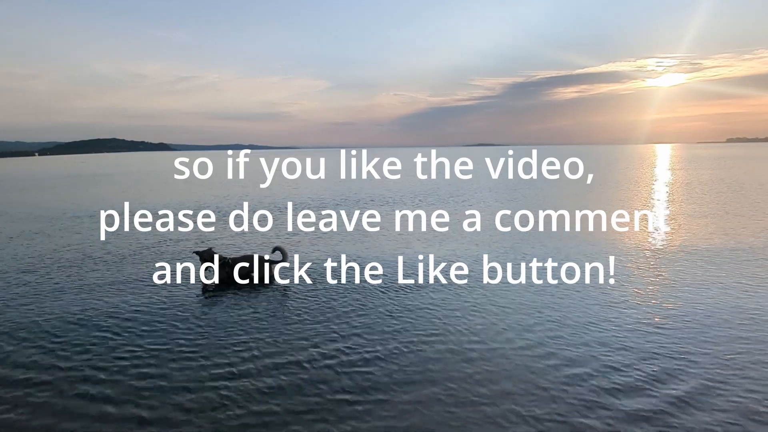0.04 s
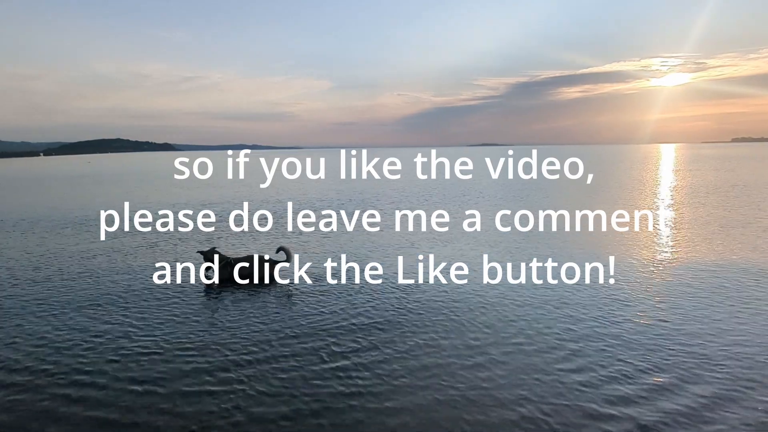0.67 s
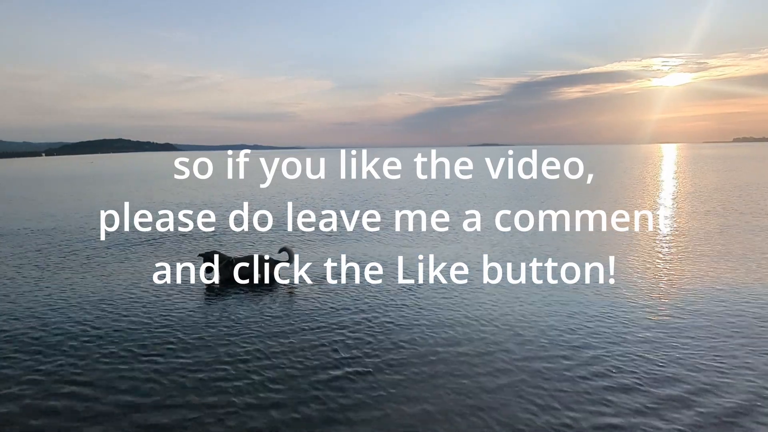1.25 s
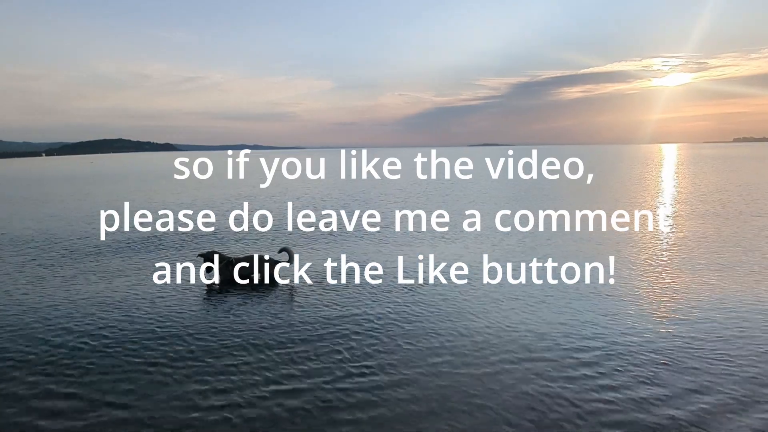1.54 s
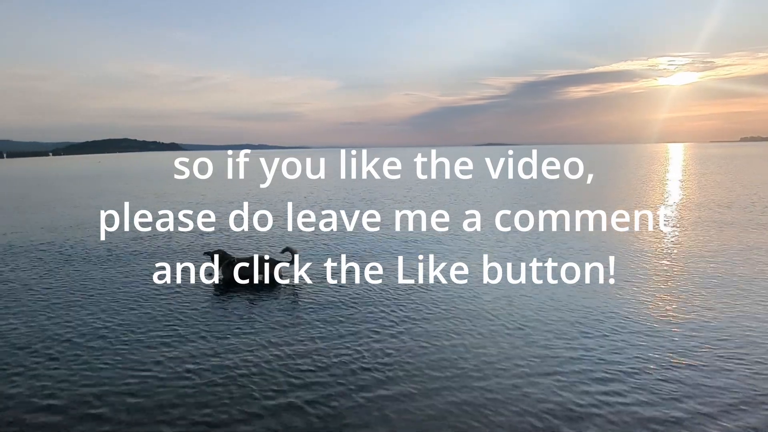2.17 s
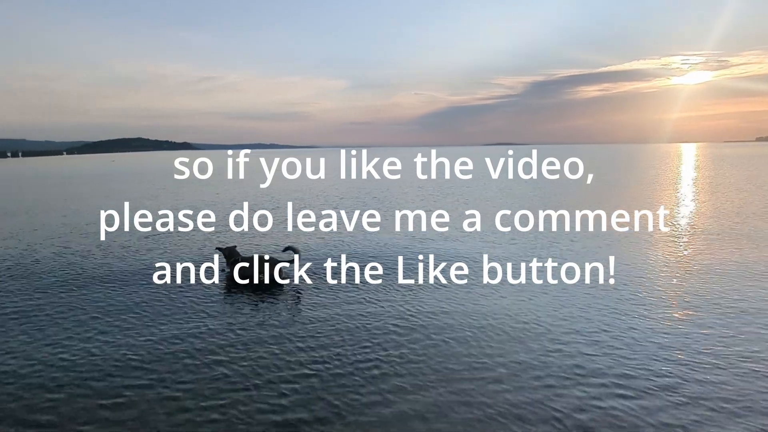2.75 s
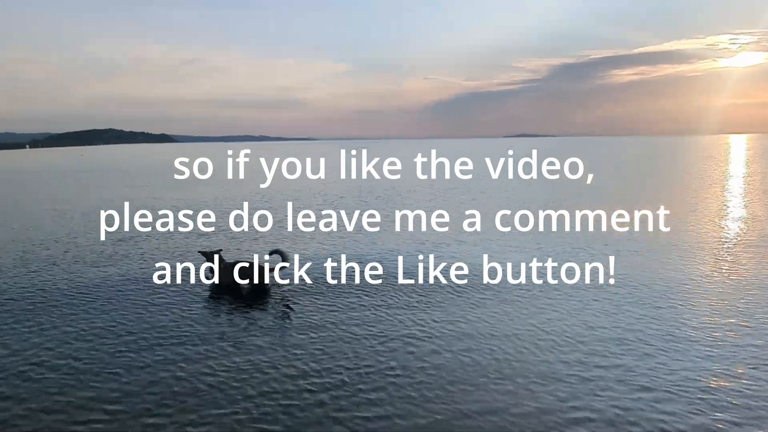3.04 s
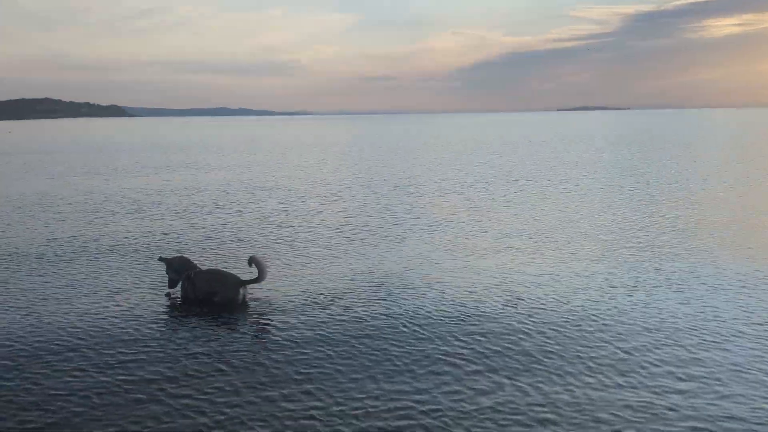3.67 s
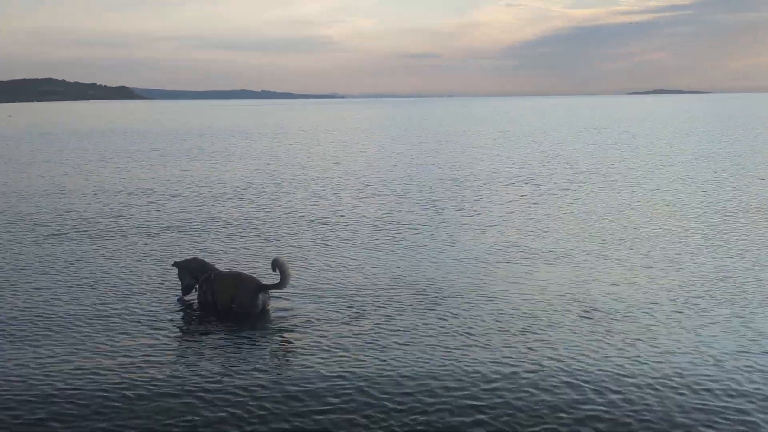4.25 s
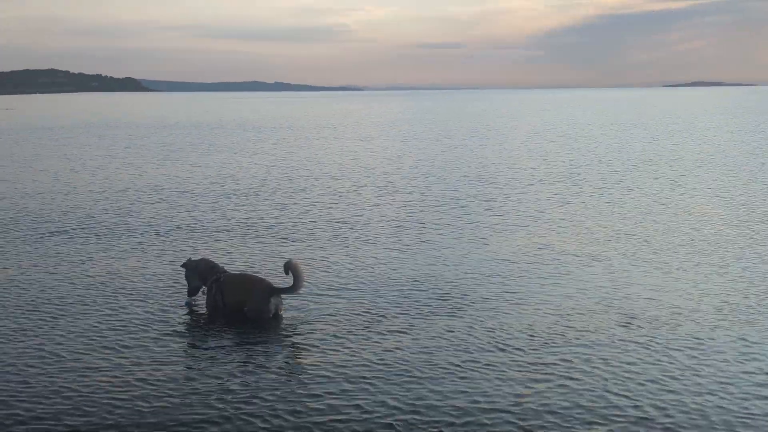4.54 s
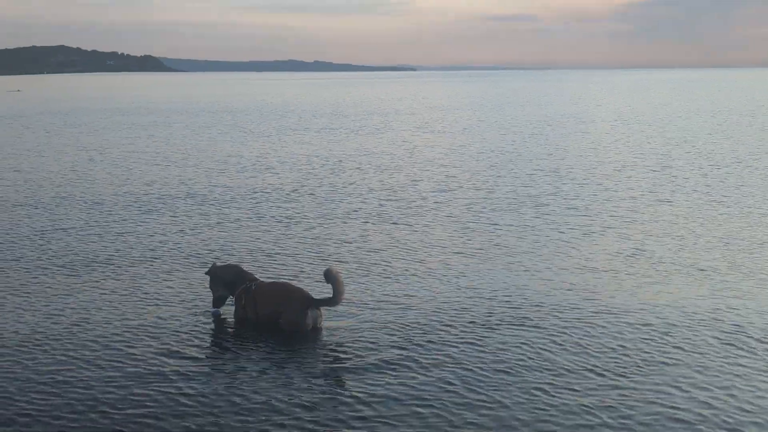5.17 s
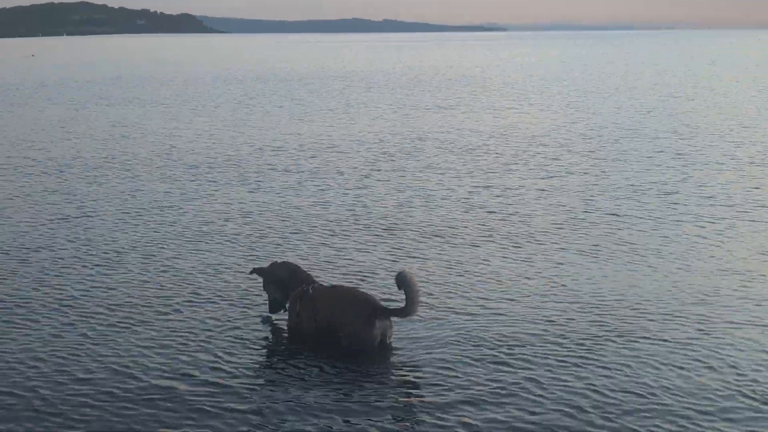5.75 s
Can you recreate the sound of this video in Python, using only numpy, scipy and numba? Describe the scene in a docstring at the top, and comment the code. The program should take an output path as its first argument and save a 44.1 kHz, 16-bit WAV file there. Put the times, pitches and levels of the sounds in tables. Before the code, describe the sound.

Shallow lake water sloshes, bubbles and drips near the microphone as a dog wades, then calms to a gentle wash with two faint, reedy bird chirps. A second bout of splashing and gurgling follows and fizzes away. In the last part, wind rumbles and thumps on the microphone, with two more faint chirps from the shore. Under it all lies a low, distant drone.

```python
"""A dog wades in the shallows of a calm lake. A low swell breaks close by: bubbles ring, drops plop and
tick, air pockets gulp. The water settles and a shore bird twitters twice. Around 3 s it sloshes and
splashes again, leaving hissing foam. From 4 s wind buffets the two microphone ports hardest; the bird
calls at 5 s and starts again at the end. Throughout, a breeze rumbles and something drones far off."""
import sys
import numpy as np
from scipy import signal
from scipy.fft import rfft, irfft
from scipy.io import wavfile
from scipy.ndimage import map_coordinates
from numba import njit

SR = 44100
rng = np.random.default_rng(int(sys.argv[2]) if len(sys.argv) > 2 else 0)


def wrap_up_sound(samples):
    """Save the sound to the file named by the first command line argument, as 16-bit audio."""
    columns = np.atleast_2d(samples).T
    # keep every value between -1 and 1, then stretch to whole-number steps
    tamed = np.clip(columns, -1, 1)
    steps = np.round(tamed * 32767).astype(np.int16)
    wavfile.write(sys.argv[1], SR, steps)


N = 264600

# water surges: crest_s, level_db, build_s, drain_s, tilt_db_per_octave, hollow_db
WATER_SURGES = [(.01, -38.5, 0.79, 0.19, -2.5, 2), (.23, -50.5, 0.19, 0.32, 1.64, 4),
                (.83, -51.5, 0.72, 0.38, -3.5, -0.4), (1.25, -61.5, 0.66, 0.32, -2.2, 7),
                (1.93, -63, 2.8, 4, -3, 1), (2.681, -56.5, 0.3, 0.071, -1, 11),
                (2.88, -47, 0.32, 0.33, -1, 2.5), (3.175, -43, 0.062, 0.073, 0.1, 4.5),
                (3.33, -54.5, 1.02, 0.56, 3, 7), (3.462, -43.5, 0.61, 0.4, -2, -5.5),
                (3.9, -61, 0.29, 0.64, -1.6, -4.5), (4.63, -59, 0.93, 0.28, -4, 1.5),
                (6.0, -75, 0.7, 0.32, 6, 6.5)]
# gurgle, slosh, hollow swish, fizz, spray: low_hz, high_hz, surge_offset_db, calm_db
WATER_BANDS = [(220, 704, -6, -85), (765, 1530, -1.5, -81.5), (1627, 2464, -1, -87),
               (2402, 5190, 1.5, -76.5), (5800, 14000, -5.5, -72.5)]
# where the water breaks, right positive: time_s, bearing_rad
SWELL_BEARING = [(0, -0.77), (.13, -0.48), (.3, -0.35), (.6, -0.94), (1.0, -1.15), (1.15, 1.02),
                 (2.7, 1.05), (2.92, .25), (3.2, 0.77), (3.33, 0.8), (3.45, -0.021), (3.65, -0.2),
                 (3.9, -0.84), (4.7, -1.06), (5.1, 0.69), (6, 1)]
# water spectrum before each band is levelled: freq_hz, gain_db
WATER_SPECTRUM = [(200, -7.5), (350, 1.5), (560, 2.5), (980, 5.5), (1400, 5), (1900, 16), (2450, -5.5),
                  (3100, -8.5), (4100, -12), (5700, -19), (8700, -21), (9900, -26), (11600, -21.5),
                  (15500, -20.5)]
# water balance, left minus right: freq_hz, pan_db
WATER_PAN = [(380, 0.5), (700, -0.5), (1000, -2.5), (1400, 2), (1900, 6), (2400, 1.5), (3500, 1),
             (5000, 2.5), (8120, -4.5), (15000, -5)]
# falling drops: start_s, level_db, pitch_hz, pan_db
DROP_PLOPS = [(0.04, -24.5, 1708, 4), (.141, -29.5, 1920, 11), (.244, -26, 2170, 5), (0.336, -39, 2540, 8),
              (.373, -36.5, 2020, 8), (.425, -35.5, 2200, 6), (0.444, -34.5, 1750, 9), (0.51, -36, 1840, 4),
              (.945, -45, 845, 2), (2.603, -36.5, 1670, 6), (2.811, -41.5, 1080, 16),
              (2.931, -28.5, 840, 1), (2.982, -34, 1770, 9), (3.01, -30.5, 1950, 7),
              (3.066, -39.5, 1950, 5), (3.132, -32, 1760, 4), (3.147, -30.5, 2050, 6),
              (3.173, -42, 1120, 8), (3.194, -30, 2120, -2), (3.214, -23.5, 1960, 8.5),
              (3.295, -29, 2350, 7), (3.417, -36.5, 1030, 15), (3.449, -29, 1820, 3),
              (3.631, -41.5, 1130, 14), (3.888, -41.5, 1126, 5), (3.952, -44, 1025, 1),
              (5.695, -52, 2260, 1), (5.97, -44.5, 2040, -3)]
# air pockets: start_s, level_db, start_hz, end_hz, length_s
AIR_GULPS = [(.001, -27.5, 444, 520, 0.0042), (.010, -36, 550, 845, 0.011), (.026, -37, 674, 520, 0.016),
             (.046, -35, 990, 1370, 0.0088), (.051, -31.5, 442, 1560, 0.033), (.092, -40.5, 395, 560, .01),
             (.108, -41, 713, 1320, .024), (1.139, -50, 400, 856, 0.026), (2.258, -55, 1010, 930, 0.018),
             (2.57, -48, 578, 400, 0.0081), (2.655, -46.5, 316, 330, 0.022), (2.99, -44, 610, 550, 0.028),
             (3.017, -42, 2125, 3100, 0.021), (3.133, -36, 1056, 960, 0.018),
             (3.142, -38.5, 408, 322, 0.039), (3.18, -39.5, 250, 310, .018), (3.282, -38, 1996, 3200, .028),
             (3.304, -38.5, 407, 336, 0.023), (3.324, -37.5, 242, 330, 0.025),
             (3.326, -37, 850, 1090, 0.012), (3.41, -33, 520, 396, 0.015), (3.436, -34.5, 383, 338, 0.019),
             (3.476, -39, 1096, 1740, 0.029), (3.505, -35, 660, 500, 0.015), (3.53, -36, 726, 970, .016),
             (3.58, -38.5, 965, 1490, 0.014), (3.597, -37.5, 427, 850, 0.018)]
# fine droplets: start_s, level_db, pitch_hz, pan_db
DROPLET_TICKS = [(0.1208, -40, 6400, 5), (.2039, -57, 7400, -8), (0.2984, -36, 9380, -3),
                 (0.334, -47, 4430, 0), (.335, -32.5, 7960, -1), (1.7584, -49.5, 8440, -12),
                 (2.38, -48.5, 6870, -7), (2.659, -46, 11400, -11), (3.13, -33.5, 3770, -8),
                 (3.1612, -34, 8070, -9), (3.215, -30, 5100, -6), (3.4345, -32.5, 12200, -9),
                 (3.5204, -40, 12600, -5.5)]
# wind spectrum: freq_hz, gain_db
WIND_SPECTRUM = [(22, -29), (34, -18), (46, -5.5), (60, -2.5), (90, -6.5), (140, -14), (200, -25.5),
                 (300, -45.5), (500, -52)]
# gusts on the ports: peak_s, level_db, half_width_s
WIND_GUSTS = [(.33, -47, 0.035), (.65, -47.5, 0.017), (.97, -47.5, 0.12), (1.33, -47.5, 0.027),
              (2.88, -47, 0.096), (3.25, -44.5, 0.067), (3.62, -48.5, 0.091), (4.17, -38.5, 0.034),
              (4.46, -37.5, 0.098), (4.66, -37, 0.084), (4.88, -40, 0.019), (5.17, -47, 0.03),
              (5.461, -44, 0.081), (5.69, -42, 0.032), (5.821, -38.5, 0.033), (5.98, -41, 0.062)]
# thumps on the housing: start_s, level_db, pitch_hz, ring_s
WIND_BUFFETS = [(0.319, -37.5, 133, 0.042), (3.607, -31.5, 126, 0.05), (4.14, -30, 148, 0.11),
                (4.602, -23, 182, 0.091), (5.657, -47, 234, 0.031), (5.777, -37.5, 302, .024),
                (5.814, -35.5, 145, 0.19), (5.986, -46, 292, 0.044)]
# drone loudness: time_s, level_db
DRONE_LEVEL = [(0, -48.5), (.5, -58.5), (.9, -52), (1.3, -55), (2.4, -54.5), (2.95, -48.5), (4.0, -54),
               (4.7, -50.5), (4.97, -69), (6, -54)]
# drone resonances: centre_hz, width_hz, gain_db
DRONE_BANDS = [(101.1, 13, 2), (125, 35.3, 1.5), (157, 16.5, 4), (186.9, 34.6, -6)]
# bird calls: start_s, length_s, top_hz, dip_depth_ratio, level_db
BIRD_CALLS = [(.781, 0.26, 1883, 0.15, -60), (1.877, 0.28, 1844, 0.28, -55), (5.04, .255, 1768, .22, -54.5),
              (5.933, .28, 1780, 0.19, -54)]
# a call lifts, holds, dips into a rasp, recovers: time_ratio, dip_ratio, level_db, rasp_ratio
BIRD_PHRASE = [(0, .55, -11, .4), (.13, 0.05, -2, .2), (.43, 0, -0.5, .2), (.52, .45, 4.5, .25),
               (0.632, 1, -7.5, .8), (.74, 1, -6, 1), (.84, .5, -8, 0.75), (.94, 0.23, -2, .15),
               (1, 0.3, 2, .3)]
# bird timbre: multiple, gain_db, pan_db
BIRD_PARTIALS = [(1, -1.5, 7), (2, 0, -5.5), (3, -4, 4), (4, -13, 3)]

PORT_LAG_S = 0.000533
SURGE_DEPTH_DB, CREST_EXPONENT = 21.5, 1.33   # depth at build_s or drain_s; 1 = pointed, 2 = bell
FOAM_DB, FOAM_FADE_DB_PER_S = -6, 18   # relative to the spray
CHURN_DB, CHURN_PER_S, CHURN_RATIO_PER_OCTAVE = 2.03, 22, 0.92
PLOP_CYCLES, SPATTER_WINDOW_S, SPATTER_DB = 32.6, 0.016, -11.5
BREEZE_DB, BREEZE_SWING_DB, BREEZE_SWINGS_PER_S = -53.5, 2, 6.7
TRILL_PERIOD_S, TRILL_DIP_RATIO, TRILL_DIP_DB, TRILL_EXPONENT = 0.0283, 0.1, 10, 9
RASP_PITCH_RATIO, RASP_FLUTTER_DB, RASP_PER_S = 0.11, 4.5, 900


def swells():
    """The shore washes smoothly; as a swell breaks, froth thickens and near bubbles stand out."""
    levels_db = surge_levels_db()
    spray_db = levels_db[-1]
    surge = from_db(0.17 * (spray_db - spray_db.max()))
    near = bubble_cloud(count=3000, median_cycles=57.6, spread_db=3.5, max_rise=0.488, scatter_rad=0.68)
    froth = bubble_cloud(count=36000, median_cycles=7.3, spread_db=1, max_rise=0.38, scatter_rad=0.49)
    wash = shore_wash(alike_below_hz=600)
    near_gain, froth_gain, wash_gain = surge ** 2, from_db(1.5) * np.sqrt(surge), from_db(-0.5)
    water = near_gain * near + froth_gain * froth + wash_gain * wash
    water /= np.sqrt(near_gain ** 2 + froth_gain ** 2 + wash_gain ** 2)
    water = coloured(water, WATER_SPECTRUM)
    water = coloured(water, WATER_PAN, db_scale=np.array([[.5], [-.5]]))
    out = 0
    for (low_hz, high_hz, _, _), level_db in zip(WATER_BANDS, levels_db):
        octaves = np.log2(low_hz / WATER_BANDS[0][0])
        churn_db = CHURN_DB * CHURN_RATIO_PER_OCTAVE ** octaves * surge * drift(CHURN_PER_S)
        out += from_db(level_db + churn_db) * unit_rms(band(water, low_hz, high_hz, order=4))
    return out


def surge_levels_db():
    """Level per band: surges build and drain over calm water; their spray leaves fading foam."""
    t = np.arange(0, N, 100) / SR
    low_hz, high_hz, offset_db, calm_db = np.transpose(WATER_BANDS)[:, :, None]
    octaves = np.log2(low_hz * high_hz) / 2
    octaves = octaves - octaves[1]   # from the slosh band
    is_swish = np.array([[0], [0], [1], [0], [0]])
    power = 0
    for crest_s, level_db, build_s, drain_s, tilt_db_per_octave, hollow_db in WATER_SURGES:
        from_crest = np.maximum((crest_s - t) / build_s, (t - crest_s) / drain_s)
        envelope_db = -SURGE_DEPTH_DB * from_crest ** CREST_EXPONENT
        colour_db = offset_db + tilt_db_per_octave * octaves + hollow_db * is_swish
        power += from_db(level_db + envelope_db + colour_db) ** 2
    spray_db = 10 * np.log10(power[-1] + 1e-20)
    fade_db = FOAM_FADE_DB_PER_S * t
    foam_db = FOAM_DB + np.maximum.accumulate(spray_db + fade_db) - fade_db   # decaying peak hold
    power[-1] += from_db(foam_db) ** 2
    levels_db = 10 * np.log10(power + from_db(calm_db) ** 2)
    return np.array([np.interp(np.arange(N) / SR, t, db) for db in levels_db])


def bubble_cloud(count, median_cycles, spread_db, max_rise, scatter_rad):
    """Bubbles of all sizes ring around the bearing of the swell."""
    when, pitch, loudness, sustain, place, climb = rng.random((count, 6)).T
    start = when * (N - 1)
    hz = (np.sqrt(200) + pitch * (np.sqrt(16000) - np.sqrt(200))) ** 2
    level_db = spread_db * np.minimum(-np.log(1 - loudness), 4)
    polarity = (-1) ** np.arange(count)
    gain = polarity * from_db(level_db) * hz ** 0.75   # flattens the spectrum
    bearing_rad = per_sample(SWELL_BEARING)[start.astype(int)] + scatter_rad * (2 * place - 1)
    lag = PORT_LAG_S * SR * np.sin(bearing_rad)
    life = median_cycles * 2 ** (2 * sustain - 1) * SR / hz
    return unit_rms(sum_rings(start, 2 * np.pi * hz / SR, gain, life, lag, max_rise * climb))


@njit
def sum_rings(start, step_rad, start_gain, life, lag, rise):
    """Rising, decaying sines at both ports; start, life and lag in samples."""
    out = np.zeros((2, N))
    for k in range(len(start)):
        for channel in range(2):
            onset = start[k] + lag[k] * (.5 - channel)
            gain, decay = start_gain[k], np.exp(-6.9 / life[k])
            for i in range(int(onset) + 1, min(N, int(onset + .8 * life[k]))):
                age = i - onset
                gain *= decay
                if i >= 0:
                    phase_rad = step_rad[k] * age * (1 + rise[k] * age / life[k] / 2)
                    out[channel, i] += gain * np.sin(phase_rad)
    return out


def shore_wash(alike_below_hz):
    """Smooth wash from all sides; long sound waves reach both ports alike."""
    mid, side = rng.standard_normal((2, N))
    side = signal.sosfilt(signal.butter(1, alike_below_hz, "high", fs=SR, output="sos"), side)
    return unit_rms(mid + side * [[1], [-1]])


def drops():
    """Close plops, each throwing three weaker drops; gulps of air; ticks of fine spray."""
    out = np.zeros((2, N))
    for start_s, level_db, hz, pan_db in DROP_PLOPS:
        plop = ring(hz, PLOP_CYCLES / hz, rise=0.27, attack_s=0.00059, noise_gain=0.43)
        add(out, start_s, from_db(level_db) * plop, pan_db, lag_s=0.00008)
        for delay, pitch in rng.random((3, 2)):
            spatter_hz = hz * 2 ** (pitch - .5)
            ring_s = PLOP_CYCLES / spatter_hz
            spatter = ring(spatter_hz, ring_s, rise=0.2, attack_s=0.00075, noise_gain=0.38)
            add(out, start_s + SPATTER_WINDOW_S * delay, from_db(level_db + SPATTER_DB) * spatter, pan_db)
    for start_s, level_db, start_hz, end_hz, length_s in AIR_GULPS:
        add(out, start_s, from_db(level_db) * gulp(start_hz, end_hz, length_s), pan_db=1.7)
    for start_s, level_db, hz, pan_db in DROPLET_TICKS:
        tick = ring(hz, ring_s=0.015, rise=0.12, attack_s=0.000088, noise_gain=0.55)
        add(out, start_s, from_db(level_db) * tick, pan_db, lag_s=0.00044)
    return out


def ring(hz, ring_s, rise, attack_s, noise_gain):
    """Damped, gliding sine plus noise; a bubble's pitch rises as it nears the surface."""
    t, envelope = ring_envelope(ring_s, attack_s)
    noise = band(rng.standard_normal(SR // 4), hz * 0.59, hz * 1.37)[:len(t)]
    tone = np.sin(2 * np.pi * hz * t * (1 + rise * t / ring_s / 2))
    return envelope * (tone + noise_gain * noise / noise.std())


def gulp(start_hz, end_hz, length_s):
    """An air pocket sings: pitch climbs as it shrinks, sinks as it swells."""
    progress = np.linspace(0, 1, int(length_s * SR) + 2)
    period_s = 1 / start_hz + (1 / end_hz - 1 / start_hz) * progress ** 1.386
    envelope = np.tanh(progress / 0.21) * np.tanh((1 - progress) / 0.16) * from_db(-4 * progress)
    return envelope * np.sin(2 * np.pi * np.cumsum(1 / period_s) / SR)


def wind():
    """Eddies rumble in each port, louder and brighter in gusts; buffets thump the housing."""
    t = np.arange(N) / SR
    eddies = unit_rms(coloured(stereo_noise(correlation=0.63), WIND_SPECTRUM))
    breeze = from_db(BREEZE_DB + BREEZE_SWING_DB * drift(BREEZE_SWINGS_PER_S)) * eddies
    gust_power = sum(from_db(level_db) ** 2 * np.exp(-((t - peak_s) / half_width_s) ** 2)
                     for peak_s, level_db, half_width_s in WIND_GUSTS)
    bright_eddies = unit_rms(coloured(stereo_noise(correlation=0.16), WIND_SPECTRUM, db_scale=0.89))
    gusts = np.sqrt(gust_power) * bright_eddies
    thumps = np.zeros((2, N))
    for start_s, level_db, hz, ring_s in WIND_BUFFETS:
        thump = ring(hz, ring_s, rise=-0.22, attack_s=0.0012, noise_gain=0.26)
        add(thumps, start_s, from_db(level_db) * thump, lag_s=0.00096)
    return band(breeze + gusts + thumps, 37.3, 434, order=5)


def bird():
    """Reedy calls of four harmonics; the shore scatters a faint tail."""
    calls = np.zeros((2, N))
    for start_s, length_s, top_hz, dip_depth, level_db in BIRD_CALLS:
        phase_rad, envelope = bird_trill(length_s, top_hz, dip_depth)
        for multiple, gain_db, pan_db in BIRD_PARTIALS:
            partial = from_db(level_db + gain_db) * envelope * np.sin(multiple * phase_rad)
            add(calls, start_s, partial, pan_db, lag_s=0.0002)
    t, tail = ring_envelope(ring_s=0.2, attack_s=0.016)
    echoes = tail * rng.standard_normal((2, SR))[:, :len(t)] / np.sqrt(np.sum(tail ** 2))
    return calls + from_db(-13.5) * signal.fftconvolve(calls, echoes, axes=1)[:, :N]


def bird_trill(length_s, top_hz, dip_depth):
    """Phase and envelope of one unbroken trill along the phrase, shaken by rasp."""
    t = np.arange(int(length_s * SR)) / SR
    time_ratio, *columns = np.transpose(BIRD_PHRASE)
    dip, level_db, rasp = (np.interp(t / length_s, time_ratio, column) for column in columns)
    trill = np.abs(np.cos(np.pi * t / TRILL_PERIOD_S)) ** TRILL_EXPONENT
    shake = RASP_PITCH_RATIO * rasp * drift(RASP_PER_S)[:len(t)]
    flutter_db = RASP_FLUTTER_DB * rasp * drift(RASP_PER_S)[:len(t)]
    hz = top_hz * (1 - dip_depth * dip) * (1 - TRILL_DIP_RATIO * trill + shake)
    fade = np.clip(np.minimum(t, length_s - t) / 0.004, 0, 1)
    envelope = fade * from_db(level_db - TRILL_DIP_DB * trill + flutter_db)
    return 2 * np.pi * np.cumsum(hz) / SR, envelope


def drone():
    """Rumble from far across the water: four low noise bands, slowly varying in level."""
    noise = stereo_noise(correlation=0.6)
    hum = sum(from_db(gain_db) * band(noise, hz - width_hz / 2, hz + width_hz / 2)
              for hz, width_hz, gain_db in DRONE_BANDS)
    return from_db(per_sample(DRONE_LEVEL)) * unit_rms(hum)


def from_db(db):
    """Decibels to gain."""
    return 10 ** (np.asarray(db) / 20)


def unit_rms(x):
    """Scale a stereo pair to mid rms 1."""
    return x / np.sqrt(np.mean(x.mean(axis=0) ** 2) + 1e-20)


def per_sample(curve):
    """A (time_s, value) curve at every sample."""
    return np.interp(np.arange(N) / SR, *np.transpose(curve))


def coloured(x, curve, db_scale=1):
    """Filter by a (freq_hz, gain_db) curve."""
    hz, db = np.transpose(curve)
    bins_hz = np.maximum(np.fft.rfftfreq(2 * N, 1 / SR), 1)
    gain = from_db(db_scale * np.interp(np.log(bins_hz), np.log(hz), db))
    return irfft(rfft(x, 2 * N) * gain)[..., :N]


def band(x, low_hz, high_hz, order=2):
    """Butterworth band-pass."""
    sos = signal.butter(order, [low_hz, min(high_hz, .49 * SR)], "band", fs=SR, output="sos")
    return signal.sosfilt(sos, x)


def stereo_noise(correlation):
    """White noise partly shared by the ports."""
    mid, side = rng.standard_normal((2, N))
    return np.sqrt(1 + correlation) * mid + np.sqrt(1 - correlation) * side * [[1], [-1]]


def drift(knots_per_s):
    """Random wander, standard deviation 1."""
    knots = rng.standard_normal(1000)
    position = np.arange(N) / SR * knots_per_s
    return map_coordinates(knots, [position], order=1, mode="wrap") / np.sqrt(2 / 3)


def ring_envelope(ring_s, attack_s):
    """Time and envelope, peak 1, decaying 60 dB per ring_s."""
    t = np.arange(int(ring_s * SR) + 2) / SR
    envelope = (1 - np.exp(-t / attack_s)) * np.exp(-np.log(1000) * t / ring_s)
    return t, envelope / envelope.max()


def add(out, start_s, sound, pan_db=0, lag_s=0):
    """Mix in a sound; positive pan_db is louder left, positive lag_s later left."""
    for channel, sign in enumerate((1, -1)):
        at = int(np.clip(round((start_s + sign * lag_s / 2) * SR), 0, N))
        out[channel, at:at + len(sound)] += from_db(sign * pan_db / 2) * sound[:N - at]


def scene():
    """Water in front, wind on the ports, drone and bird far off."""
    return swells() + drops() + wind() + drone() + bird()


def record(dry, cutoff_hz=15800):
    """Steep low-pass on the top treble."""
    return signal.sosfilt(signal.ellip(12, .1, 80, cutoff_hz, fs=SR, output="sos"), dry)


dry = scene()
out = record(dry)
wrap_up_sound(out)
```